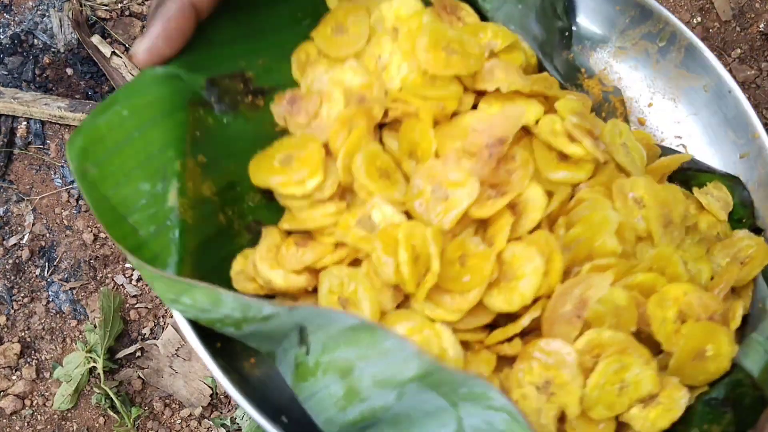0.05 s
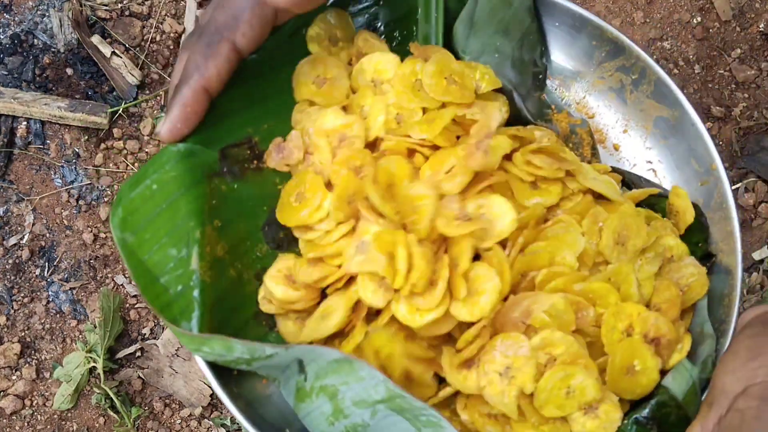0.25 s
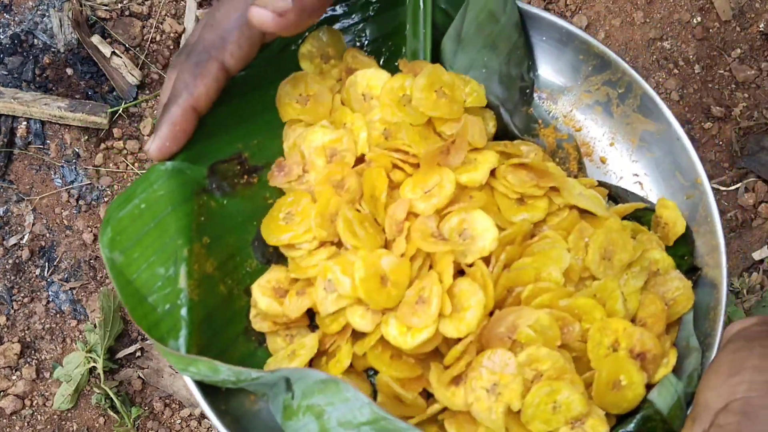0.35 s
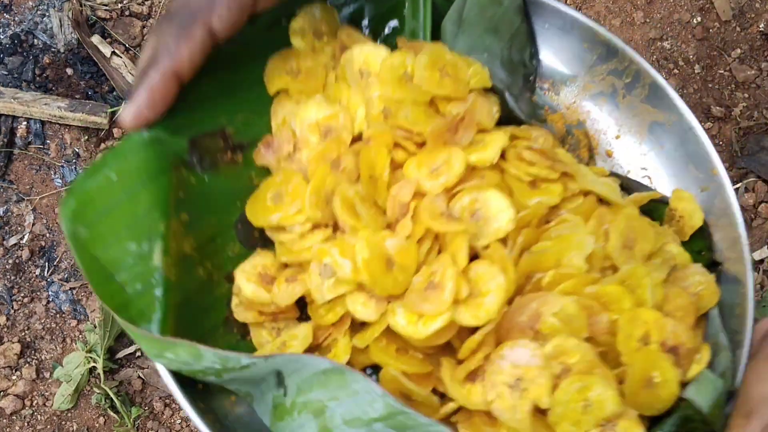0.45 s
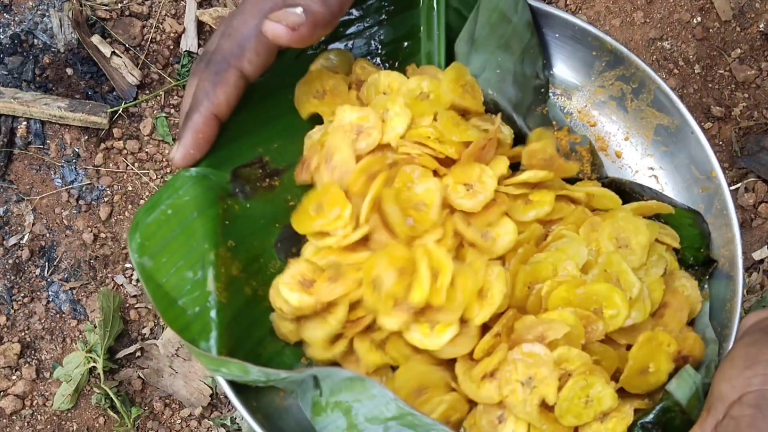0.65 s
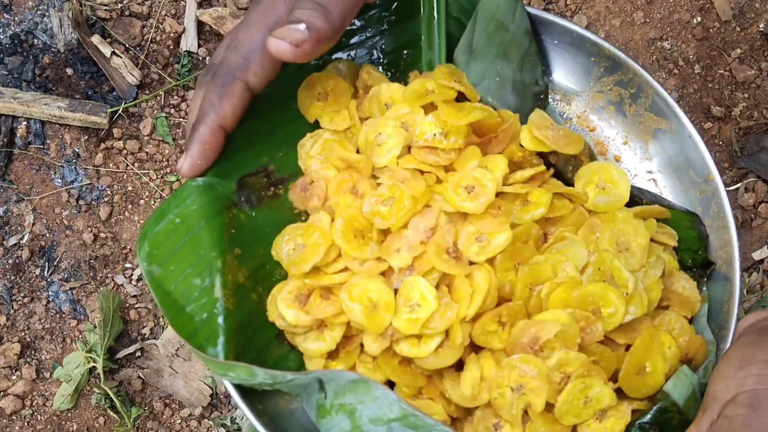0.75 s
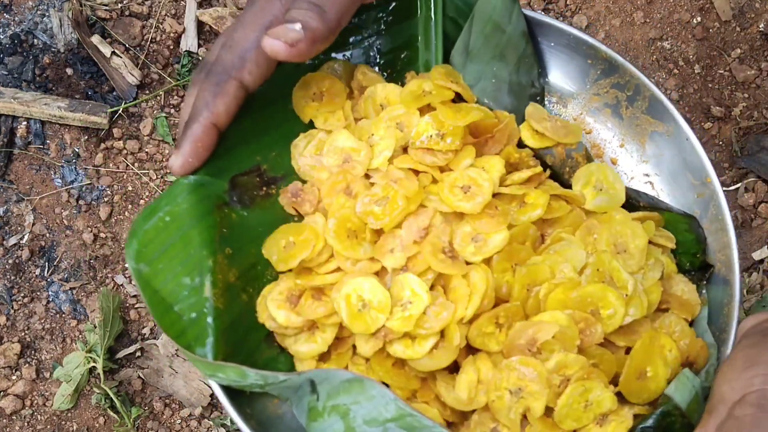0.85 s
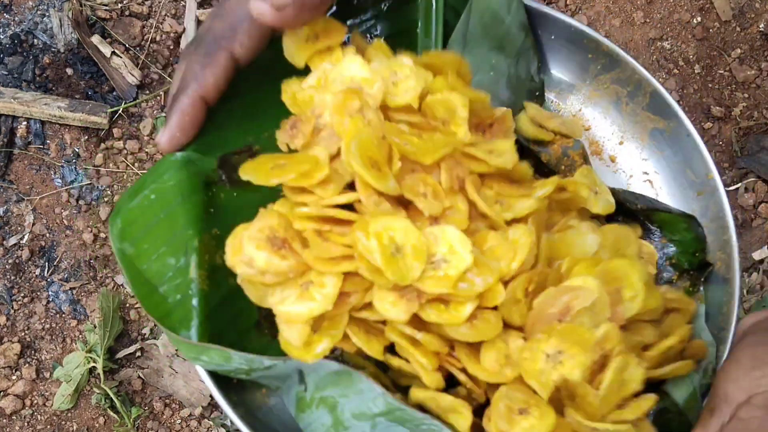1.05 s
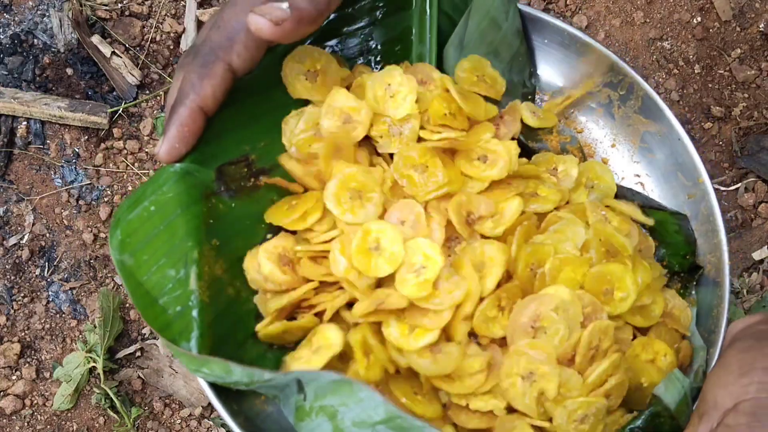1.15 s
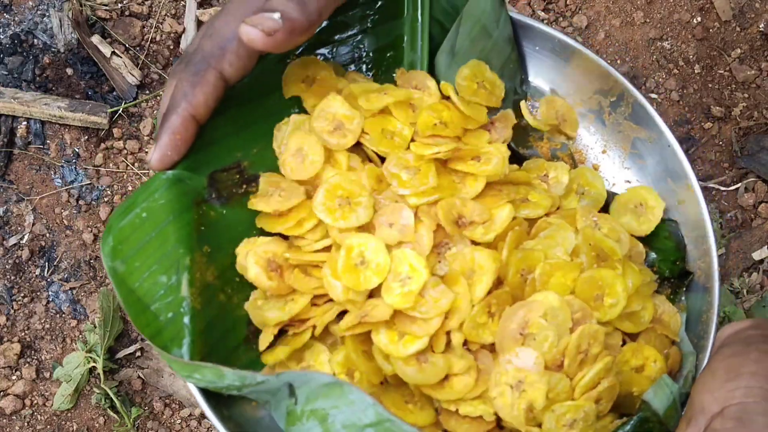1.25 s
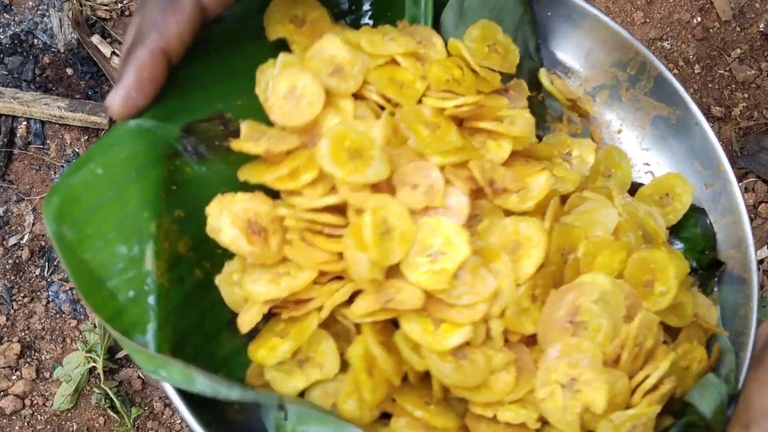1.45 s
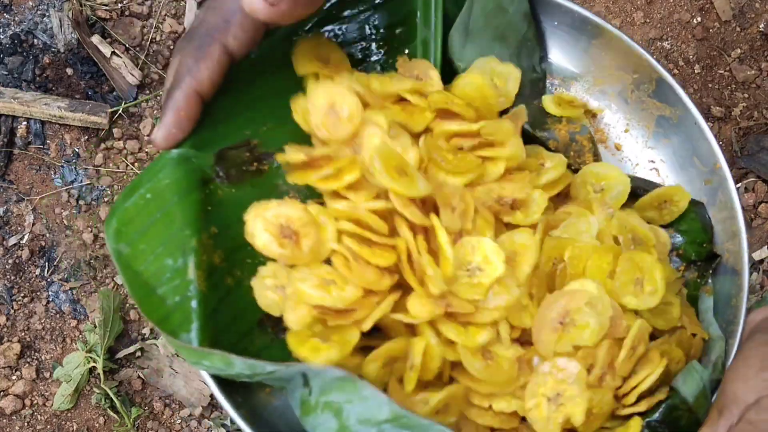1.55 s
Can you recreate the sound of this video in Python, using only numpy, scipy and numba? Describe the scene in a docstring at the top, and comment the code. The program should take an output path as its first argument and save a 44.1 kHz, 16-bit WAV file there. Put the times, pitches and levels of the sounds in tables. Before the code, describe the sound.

A heap of crisp chips rustles and rattles as it is tossed on a metal plate.

```python
"""Outdoors, close to a leaf-lined steel plate on which a heap of crisp fried chips is tossed.
At each lift the chips slide softly and the leaf rubs on the steel. The chips land in a shower
of brittle clicks, thudding and pattering on the damped plate, whose modes ring briefly.
Three tosses land and a fourth is just starting, over a faint open-air background."""
import sys
import numpy as np
from scipy import signal
from scipy.fft import rfft, irfft
from scipy.io import wavfile
from numba import njit

SR = 44100
rng = np.random.default_rng(int(sys.argv[2]) if len(sys.argv) > 2 else 0)


def waveform_to_disk(signal):
    """Save audio, clipped to [-1, 1], as 16-bit WAV at the path in sys.argv[1]."""
    frames = np.transpose(np.atleast_2d(signal))
    scaled = np.clip(frames, -1, 1) * 32767
    samples = np.round(scaled).astype(np.int16)
    wavfile.write(sys.argv[1], SR, samples)


N = 70560
T = np.arange(N) / SR

# one table per landing: (time [s], heap thud [dB], plate patter [dB], chip clicks [dB])
LANDING_LEVELS = [
    [(0.222, -59, -34.5, -46.5), (0.236, -45, -40.5, -39.5), (0.258, -34.5, -25, -32),
     (0.28, -36, -27, -30.5), (0.29, -35.5, -34, -33), (0.314, -42.5, -37, -36.5), (0.334, -36, -36, -36.5),
     (0.37, -79, -55.5, -53), (0.404, -53, -49, -63), (0.434, -69, -75, -74), (0.46, -59.5, -80, -71)],
    [(0.658, -47, -34.5, -48.5), (0.672, -40.5, -37.5, -37.5), (0.69, -28, -25.5, -30.5),
     (0.706, -37.5, -29, -29.5), (0.728, -37, -30.5, -32.5), (0.742, -42, -34.5, -37),
     (0.754, -40, -33, -31.5), (0.794, -55, -52, -47.5), (0.822, -54, -44.5, -53.5), (0.9, -68, -76, -62.5)],
    [(1.116, -60, -39, -43.5), (1.128, -38.5, -36.5, -43.5), (1.14, -34.5, -24.5, -32.5),
     (1.156, -41.5, -26.5, -32.5), (1.196, -35.5, -31, -32), (1.228, -47.5, -38, -37),
     (1.344, -60.5, -51.5, -59.5), (1.39, -94, -58.5, -57.5), (1.41, -73, -86, -74)],
]


def undb(db):
    """Decibels to gain."""
    return 10 ** (np.asarray(db) / 20)


def gain_at(points, hz):
    """Gain of (frequency [Hz], level [dB]) points joined on a log-frequency axis."""
    points_hz, db = np.array(points, float).T
    return undb(np.interp(np.log(hz + 1), np.log(points_hz), db))


def colour(x, points, size=2048):
    """Minimum-phase filter with the given spectrum and unit power gain."""
    cepstrum = irfft(np.log(gain_at(points, np.fft.rfftfreq(size, 1 / SR))))
    cepstrum[1:size // 2] *= 2
    cepstrum[size // 2 + 1:] = 0
    response = irfft(np.exp(rfft(cepstrum)))
    return signal.fftconvolve(x, response[None] / np.linalg.norm(response))[:, :N]


def highpass(x, hz, order):
    """Butterworth high-pass."""
    return signal.sosfilt(signal.butter(order, hz, "high", fs=SR, output="sos"), x)


def swells(events, attack_s, release_s):
    """Summed attack-hold-release envelopes of (start [s], length [s], level [dB]) rows."""
    envelope = np.zeros(N)
    for start_s, length_s, db in events:
        attack = np.clip((T - start_s) / attack_s, 0, 1)
        release = np.exp(-np.maximum(T - start_s - length_s, 0) / release_s)
        envelope += undb(db) * attack * release
    return envelope


@njit
def ring(starts_s, hz, decays_s, sizes):
    """Sum of short damped sines."""
    out = np.zeros(N)
    for k in range(len(starts_s)):
        first = int(starts_s[k] * SR) + 1
        pole = (2j * np.pi * hz[k] - 1 / decays_s[k]) / SR
        phasor = sizes[k] * np.exp(pole * (first - starts_s[k] * SR))
        step = np.exp(pole)
        for i in range(max(first, 0), min(first + int(6 * decays_s[k] * SR), N)):
            out[i] += phasor.imag
            phasor *= step
    return out


def shower(level, band_hz, cycles, scatter_db, lag_s, spread_s, pan_db, count):
    """Random collisions, each with its own pitch, size and place; more and harder as level rises."""
    full_rate_db, rate_exponent = -32, 0.2
    jitter, chance, pitch, force, place, side, length = rng.random((count, 7)).T
    starts_s = (np.arange(count) + 3 * jitter) / count * N / SR
    strength = np.interp(starts_s, T, level)
    share = np.clip((strength / undb(full_rate_db)) ** rate_exponent, 0.01, 1)
    hz = band_hz[0] + (band_hz[1] - band_hz[0]) * pitch
    decays_s = cycles * (0.5 + length) / hz
    sizes = undb(-scatter_db * np.log(0.024 + force))
    sizes /= np.sqrt(np.mean(sizes ** 2))
    sizes *= strength * (chance < share)
    sizes *= np.sqrt(4 * N / SR / count / decays_s / share)  # rms follows level
    delay_s = lag_s + spread_s * (2 * place - 1)
    tilt_db = pan_db * (2 * side - 1)
    return np.array([ring(starts_s + half * delay_s, hz, decays_s, sizes * undb(half * tilt_db))
                     for half in (-0.5, 0.5)])


def cracks(events, decay_s, spectrum):
    """A decaying burst of coloured noise per (time [s], level [dB]) row."""
    envelope = sum(undb(db) * (T >= at_s) * np.exp(-np.abs(T - at_s) / decay_s) for at_s, db in events)
    return envelope * colour(rng.standard_normal((2, N)), spectrum) / 2


def outdoors():
    """Faint wavering open-air background, alike left and right in the bass."""
    air_spectrum = [(25, -25), (55, -7), (85, 1), (150, -4), (300, -7.5), (650, -12), (1300, -4),
                    (2200, -11.5), (3600, -16.5), (4500, -22), (14000, -26)]  # (frequency [Hz], level [dB])
    level_db, waver_db = -65.5, 1.5
    mid, side = colour(rng.standard_normal((2, N)), air_spectrum)
    side = highpass(side, hz=1770, order=1)
    waver = np.interp(T, np.linspace(0, T[-1], 40), rng.standard_normal(40))
    return undb(level_db + waver_db * waver) * np.array([mid + side, mid - side])


def leaf():
    """The leaf catches and slips on the steel in tiny dull steps."""
    rubs = [(-.02, 0.071, -55), (.06, 0.1, -58), (.15, 0.013, -49), (.385, 0.027, -56), (.45, 0.053, -67),
            (.558, 0.013, -53.5), (.585, 0.063, -52.5), (.89, 0.068, -58), (1.007, 0.083, -57),
            (1.35, 0.025, -55), (1.425, 0.024, -64.5), (1.496, 0.13, -55)]  # leaf on steel: (start [s], length [s], level [dB])
    rub_spectrum = [(100, -11.5), (250, -3.5), (400, -6.5), (650, -8), (950, -2), (1500, -3), (2200, -7),
                    (3600, -9.5), (4600, -16), (12000, -21)]  # (frequency [Hz], level [dB])
    rubbing = swells(rubs, attack_s=0.0073, release_s=0.01)
    steps = shower(rubbing, band_hz=(203, 6300), cycles=0.31, scatter_db=3.5,
                   lag_s=7e-5, spread_s=13e-5, pan_db=10, count=8000)
    return undb(-4.5) * colour(steps, rub_spectrum)


def tosses():
    """Envelopes of thud, patter and clicks: the landings plus the slides around them."""
    slides = [(-.02, 0.078, -62.5), (0.147, 0.046, -51.5), (.385, 0.02, -57), (.565, 0.025, -62),
              (.594, .03, -50), (.905, 0.048, -64), (1.03, 0.06, -50.5), (1.364, 0.0068, -58),
              (1.5, 0.017, -67), (1.521, 0.03, -50.5), (1.582, .03, -43)]  # chips sliding over each other: (start [s], length [s], level [dB])
    rise_s, settle_s, slide_thud_db = 0.0025, 0.022, -7
    landing = np.zeros((3, N))
    for table in LANDING_LEVELS:
        times_s, *levels_db = np.array(table, float).T
        fade = np.maximum(times_s[0] - T, 0) / rise_s + np.maximum(T - times_s[-1], 0) / settle_s
        landing += undb([np.interp(T, times_s, db) for db in levels_db]) * np.exp(-fade)
    sliding = swells(slides, attack_s=0.024, release_s=0.033)
    return np.hypot(landing, sliding * undb([[slide_thud_db], [0], [0]]))


def knocks():
    """Clumps hit the leaf and plate: a dull tock of a cycle or two with a crack on top."""
    hits = [(.152, -47), (.162, -37), (.222, -24), (0.2534, -26), (0.2635, -22.5), (.278, -18),
            (.3335, -19), (.644, -61), (0.6587, -23.5), (.687, -19), (.726, -12.5), (.762, -23.5),
            (0.8135, -35), (1.1175, -25), (1.1385, -17.5), (1.1424, -29), (1.1562, -11.5), (1.371, -45),
            (1.399, -52), (1.5659, -27)]  # clump impacts: (time [s], level [dB])
    crack_spectrum = [(400, -19), (900, -3), (1700, 3), (3500, 0), (6000, -15), (13000, -26)]  # (frequency [Hz], level [dB])
    tock_hz, tock_decay_s = 1076, 0.00081
    times_s, db = np.array(hits, float).T
    hz = tock_hz * np.exp(0.092 * rng.standard_normal(len(hits)))
    tocks = ring(times_s, hz, np.full(len(hits), tock_decay_s), undb(db))
    tocks = highpass(tocks, hz=247, order=2)
    return tocks + undb(-5.5) * cracks(hits, decay_s=0.0026, spectrum=crack_spectrum)


def plate(thud_level, patter_level):
    """The heap thuds, patters and knocks on the plate, whose modes ring briefly under the load."""
    modes = [(87.8, 0.64, 12), (184, 0.29, 1), (260.2, 0.18, 3.5), (343, 0.1, 0.5), (498, 0.1, -1),
             (545.6, 0.27, 1), (859, .16, -6), (1007.6, .16, 3.5), (1154, .14, -13), (1292, 0.073, -8),
             (1418, 0.11, 0.5), (1690, .15, -13), (2000, .2, 2), (2550, 0.23, -15)]  # loaded plate: (frequency [Hz], t60 [s], gain [dB])
    thud_spectrum = [(40, -30.5), (90, -14.5), (150, -8), (250, 2.5), (400, 1.5), (560, -2.5), (700, -9.5),
                     (1500, -26.5)]  # (frequency [Hz], level [dB])
    patter_spectrum = [(350, -27.5), (650, -10), (830, 2.5), (1080, 1.5), (1400, -1.5), (1900, -13),
                       (3000, -12), (6000, -44.5)]  # (frequency [Hz], level [dB])
    thud = shower(thud_level, band_hz=(92, 1020), cycles=0.37, scatter_db=1,
                  lag_s=2e-5, spread_s=5e-5, pan_db=1.5, count=2000)
    patter = shower(patter_level, band_hz=(550, 3170), cycles=0.65, scatter_db=3,
                    lag_s=8e-5, spread_s=9e-5, pan_db=9.5, count=3500)
    blows = undb(-14.5) * colour(thud, thud_spectrum) + undb(-11) * colour(patter, patter_spectrum)
    blows += knocks()
    t = T[:SR // 3]
    response = np.zeros(len(t))
    for hz, t60_s, db in modes:
        damping = np.log(1000) / t60_s
        response += undb(db) * 2 * damping / SR * np.exp(-damping * t) * np.cos(2 * np.pi * hz * t)
    return blows + undb(-3) * signal.fftconvolve(blows, response[None])[:, :N]


def buried(x):
    """The bottom of the heap lands first, its treble muffled by the chips above."""
    width_s, corner_hz, treble_db = 0.036, 6600, -6.5
    cover = sum(np.exp(-((T - table[0][0]) / width_s) ** 2) for table in LANDING_LEVELS)
    dull = signal.sosfiltfilt(signal.butter(1, corner_hz, fs=SR, output="sos"), x)
    return dull + (x - dull) * undb(treble_db * cover)


def chips(level):
    """Thin crisp slices rustle, click and snap together; each click bounces about inside the heap."""
    snaps = [(.011, -48), (.1845, -33), (.2488, -27), (.333, -19), (.457, -40.5), (.6185, -39), (.755, -24),
             (.886, -49), (1.1175, -28), (1.133, -18)]  # single chips colliding: (time [s], level [dB])
    click_spectrum = [(700, -39), (1600, 2.5), (2500, 0), (4000, 0.5), (6000, -3), (9000, -3.5),
                      (12500, -7), (15000, -15)]  # (frequency [Hz], level [dB])
    tail_decay_s, tail_db = 0.0022, -6.5
    rustle = shower(level, band_hz=(1210, 15870), cycles=3.33, scatter_db=2.5,
                    lag_s=0, spread_s=21e-5, pan_db=9, count=20000)
    ticks = shower(level, band_hz=(1580, 12400), cycles=0.77, scatter_db=1.5,
                   lag_s=0, spread_s=14e-5, pan_db=4.5, count=900)
    clicks = rustle + undb(-6) * ticks
    pole = np.exp(-2 / (tail_decay_s * SR))
    tail_power = signal.lfilter([1 - pole], [1, -pole], clicks ** 2)
    tail = np.sqrt(tail_power) * rng.standard_normal((2, N))
    heap = undb(0.1) * colour(clicks + undb(tail_db) * tail, click_spectrum)
    return buried(heap + cracks(snaps, decay_s=0.00098, spectrum=click_spectrum))


def scene():
    """Chips, plate, leaf and the air around them."""
    thud_level, patter_level, click_level = tosses()
    return chips(click_level) + plate(thud_level, patter_level) + leaf() + outdoors()


def record(dry):
    """Two microphone ports colour the sound differently; deep bass and top treble are cut."""
    port_balance = [(250, -2), (600, 1.5), (1000, 1.2), (2000, 0), (3800, 1.5), (6500, 1.5), (8400, -3),
                    (10500, -1.5), (13000, 2)]  # (frequency [Hz], left minus right [dB])
    low_cut_hz, top_hz = 74, 15350
    left_gain = np.sqrt(gain_at(port_balance, np.fft.rfftfreq(2 * N, 1 / SR)))
    heard = irfft(rfft(dry, 2 * N) * np.array([left_gain, 1 / left_gain]))[:, :N]
    heard = highpass(heard, low_cut_hz, order=2)
    return signal.sosfilt(signal.ellip(10, 0.2, 80, top_hz, fs=SR, output="sos"), heard)


dry = scene()
out = record(dry)
waveform_to_disk(out)
```